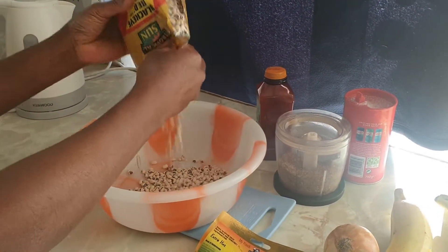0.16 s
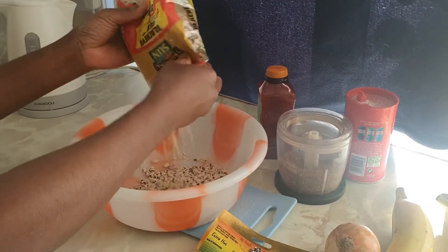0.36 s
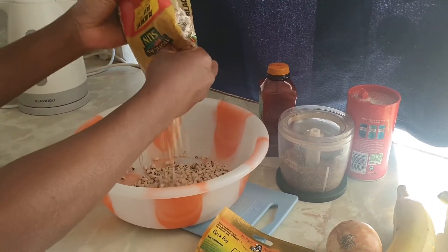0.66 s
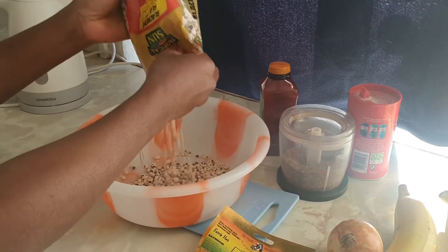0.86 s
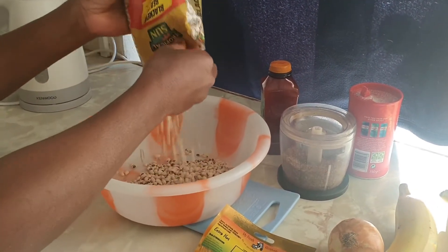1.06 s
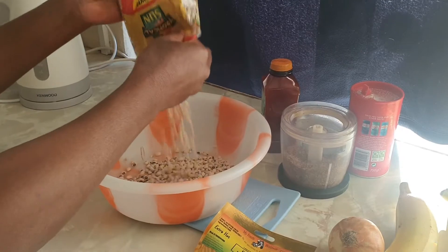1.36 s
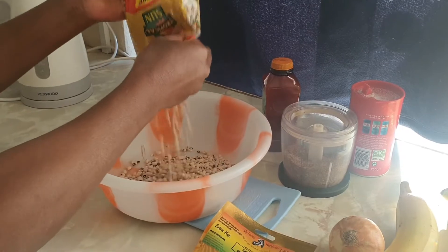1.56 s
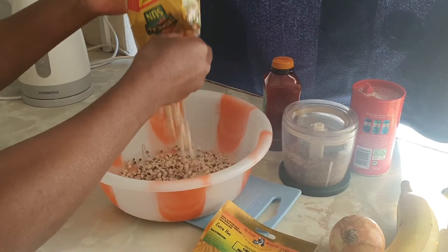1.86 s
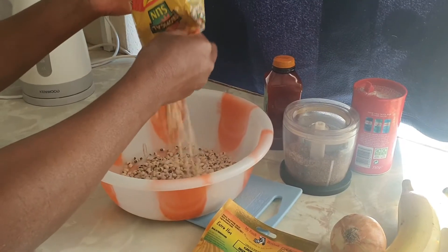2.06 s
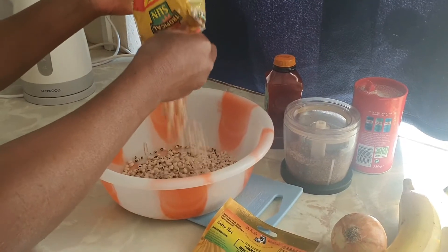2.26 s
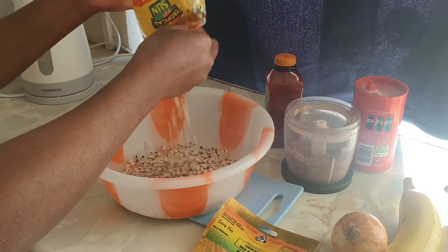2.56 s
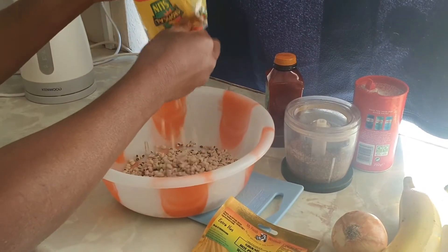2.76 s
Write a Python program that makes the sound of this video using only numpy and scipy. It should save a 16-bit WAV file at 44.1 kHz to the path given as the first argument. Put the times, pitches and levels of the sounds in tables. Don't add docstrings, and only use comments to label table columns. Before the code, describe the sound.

Dried beans are shaken from a plastic packet into a plastic bowl, a dense clicking rattle surging about five times a second, with sharp single snaps and bright rustle, heard close in a small hard kitchen.

```python
import sys
import numpy as np
from scipy import signal
from scipy.fft import rfft, irfft
from scipy.io import wavfile

SR = 44100
rng = np.random.default_rng(int(sys.argv[2]) if len(sys.argv) > 2 else 0)


def output_pcm(signal):
    pcm = np.clip(np.atleast_2d(signal).T, -1, 1) * 32767
    wavfile.write(sys.argv[1], SR, np.round(pcm).astype(np.int16))


def amplitude_ratio(level_db):
    exponent = np.asarray(level_db, float) / 20
    return 10 ** exponent


N = 127890

# time_s, level_db
HUM_SWELL = [(0, -63), (.3, -79), (.62, -75), (.75, -54), (1.0, -56), (1.1, -62.5), (1.55, -66),
             (1.7, -54.5), (2.15, -58), (2.25, -64), (2.9, -63)]
# pitch_hz, level_db (per Hz)
ROOM_COLOUR = [(35, -55), (60, -14.5), (135, -12), (179, -4), (248, -8), (430, -3), (500, -16.5),
               (650, -11), (1100, -120)]
# pitch_hz, level_db
STEREO_WIDTH = [(60, -6), (180, -22), (550, -1.5), (1650, -0.5), (4970, -2), (15000, 0.5)]
# time_s, level_db
BEAN_FLOW = [(0, -33), (.04, -35.5), (.078, -36), (.11, -32.5), (.2, -28), (.38, -27), (.55, -22.5),
             (.7, -24), (.84, -24.5), (1.03, -24.5), (1.2, -22), (1.43, -24), (1.65, -22.5), (1.85, -26.5),
             (2.0, -26.5), (2.35, -28), (2.7, -30), (2.8, -34.5)]
# time_s, level_db
BEAN_BUNCHES = [(.043, -4), (.078, -7.5), (.149, -7.5), (.222, -3.5), (.296, 1.5), (.345, 2.5), (.395, -2),
                (.452, -3), (.475, 3), (.528, -5), (.551, -4), (.575, 2), (.615, 1.5), (.736, -3),
                (.805, 4), (.824, -3), (.901, 1), (.915, -3), (.932, 1.5), (.963, -2.5), (1.037, -8.5),
                (1.138, -3), (1.187, 2), (1.245, -0.5), (1.303, 2.5), (1.422, 0), (1.507, -1), (1.54, -0.5),
                (1.567, -3.5), (1.628, -5.5), (1.768, -6), (1.812, 2), (1.832, -3), (1.88, 3), (1.944, 3),
                (1.966, -2), (1.985, -1.5), (2.014, -1.5), (2.156, -3), (2.209, -1.5), (2.337, -2),
                (2.357, -1), (2.427, 0.5), (2.48, 4.5), (2.579, -1.5), (2.615, 5), (2.658, -2), (2.71, 2),
                (2.735, -2.5), (2.791, -4.5), (2.835, -1.5), (2.874, -2)]
# time_s, rattle_surge_db, rustle_surge_db
PACKET_SHAKES = [(.006, 13.5, 7), (0.256, 5.5, 4.5), (0.329, 3.5, 1.5), (.47, 0.5, -1), (.68, 2, 7.5),
                 (0.885, 7.5, 10), (1.09, 5.5, 8), (1.3, 6, 2.5), (1.498, 7, 7), (1.707, 2, 5),
                 (1.907, 3.5, 5.5), (2.066, 3, 8), (2.268, 3.5, 4), (2.458, 2.5, 0.5), (2.699, 2.5, 1),
                 (2.878, 9, 8)]
# time_s, level_db
RUSTLE_LEVEL = [(0, -57), (.075, -62), (.2, -46), (.3, -46), (.55, -44.5), (1.0, -46.5), (1.4, -42),
                (1.98, -43.5), (2.4, -39.5), (2.62, -45), (2.72, -40.5), (2.79, -52), (2.835, -49),
                (2.86, -47)]
# pitch_hz, level_db (per Hz)
RUSTLE_COLOUR = [(4120, -9), (7000, -8), (7940, -4), (8610, 0), (10100, -9.5), (12000, 0.5), (14200, -10),
                 (15800, -11)]
# start_s, snap_peak_db, snap_pitch_hz, wall_ring_db
HARD_BEANS = [(.007, -19.5, 2960, -20.5), (.031, -23.5, 900, -35), (0.092, -31, 3000, -27),
              (0.101, -30, 2480, -22), (.116, -14, 3140, -18), (.136, -38, 1600, -35),
              (0.16, -23, 4560, -34), (0.18, -25, 2520, -20.5), (.249, -19, 2500, -21),
              (0.257, -5.5, 4070, -25), (0.406, -20, 2270, -27), (.419, -6.5, 4970, -27),
              (0.465, -12, 3600, -31), (.509, -17, 3000, -24), (.65, -12, 3700, -18),
              (0.863, -16, 2500, -21), (0.925, -4, 3470, -14), (0.979, -7, 3250, -28),
              (1.003, -10.5, 3580, -33), (1.047, -13, 3020, -38), (1.087, -14, 3800, -24),
              (1.299, -7, 3500, -21), (1.396, -15, 2500, -32), (1.589, -8.5, 3620, -33),
              (1.642, -16, 3340, -30), (1.841, -12.5, 4040, -24), (1.924, -17, 2400, -22),
              (1.976, -21, 3000, -25), (2.022, -13, 4930, -36), (2.052, -16, 2500, -17.5),
              (2.061, -15.5, 1500, -15), (2.110, -26, 1500, -21), (2.222, -20, 3200, -29),
              (2.256, -13, 1450, -17.5), (2.268, -24, 1450, -23), (2.273, -21, 1500, -19),
              (2.286, -14, 1950, -30), (2.3735, -7, 4600, -26), (2.3755, -12, 5600, -30),
              (2.603, -12, 3300, -24), (2.8465, -7, 3800, -28), (2.408, -14, 4480, -36),
              (2.464, -10, 4100, -22), (2.555, -15, 1640, -25.5), (2.678, -20, 3440, -20.5),
              (2.801, -26, 2600, -35), (2.8205, -18, 2430, -26), (2.852, -19.5, 1390, -22.5),
              (2.883, -20.5, 2000, -34), (2.89, -24, 3900, -28)]
# pitch_hz, level_db (per Hz)
CLICK_COLOUR = [(200, -36.5), (560, -12), (1000, -10.5), (1700, -6), (3800, -4), (5000, -6.5), (6650, -5.5),
                (8200, -23.5)]
# pitch_hz, level_db, t60_s
BOWL_MODES = [(553.6, -7, 0.041), (600, -9, 0.064), (690, -1.5, 0.027), (780, -6.5, 0.039),
              (1035.4, -8, 0.048), (1158, -8, 0.051), (1280, -1, 0.019), (1433, -0.5, 0.027),
              (1635, 1.5, 0.026), (1743, -4, 0.04), (1953, 0, 0.021), (2414, 2, 0.021), (3544, 4.5, 0.012),
              (4070, -3.5, 0.02)]

ROOM_NOISE_DB, COUNTER_FOLLOWS = -51, 0.6
HUM_HZ, HUM_WANDER_HZ = 41.8, 0.76
KITCHEN_T60_S, KITCHEN_DB, KITCHEN_GAP_S = 0.57, -8, 0.0034
LEFT_DB, RIGHT_LAG = 0.5, 2

SURGE_RISE_S, SURGE_FALL_S, SURGE_SHARE = 0.025, 0.02, 0.7
BUNCH_S, BUNCH_CHANCE_DB = 0.0055, 0.36
FIRST_TOUCH = 2.9
BEAN_LOW_HZ, BEAN_HIGH_HZ, BEAN_WIDTH_HZ, BEAN_RING = 1500, 4150, 250, 1.47

CLICKS_PER_S, CLICK_SPREAD_DB, CLICK_T60_S, CLICK_DB, CLUMP_DB = 2600, 3.0, 0.0053, 0.5, 1.0
TICKS_PER_S, TICK_SPREAD_DB, TICK_T60_S, TICK_DB, TICK_CLUMP_DB = 2500, 2.5, 0.0076, 2.6, 1.4
SHARED_TICKS = 0.43
TOP_HZ = 15800

KNOCKS_PER_S, KNOCK_SPREAD_DB, KNOCK_DB = 900, 3, -3
BOWL_LOWEST_HZ = 389
KNOCK_SURGE, DEEP_SURGE, DEEP_HZ = 0.2, 0.36, 900
DEEP_FOLLOWS = 0.59
FILL_DB_PER_S = -1

HIT_DB, HIT_RING_DB, HIT_T60_S = 0.0, 1.0, 0.016
SNAP_OCTAVES, SNAP_TOP_HZ, SNAP_AIR = 0.6, 6740, 0.25
WALL_HZ, WALL_OCTAVES = 1580, 0.22
WALL_SPREAD_S = 0.002


def rms_one(x):
    return x / np.sqrt(np.mean(x ** 2) + 1e-20)


def curve(rows):
    return np.interp(np.arange(N) / SR, *np.transpose(rows))


def at_hz(points, size):
    hz, value = np.transpose(points)
    return np.interp(np.log(np.fft.rfftfreq(size, 1 / SR) + 1), np.log(hz), value)


def colour(x, spectrum):
    cepstrum = irfft(np.log(amplitude_ratio(np.maximum(at_hz(spectrum, size=8192), -90))))
    cepstrum[1:4096] *= 2
    cepstrum[4097:] = 0
    impulse = irfft(np.exp(rfft(cepstrum)))[None, :4096]
    return signal.fftconvolve(x, impulse, axes=1)[:, :N]


def pair(mid, side):
    side = irfft(rfft(side) * amplitude_ratio(at_hz(STEREO_WIDTH, size=len(side))), len(side))
    return np.array([mid + side, mid - side])


def drift(rate_hz):
    r = np.exp(-2 * np.pi * rate_hz / SR)
    noise = rng.standard_normal(N + SR)
    return rms_one(signal.lfilter([1], [1, -2 * r, r * r], noise)[SR:])


def room_noise():
    phase = 2 * np.pi * np.cumsum(HUM_HZ + HUM_WANDER_HZ * drift(2.2)) / SR
    hum = np.sqrt(2) * amplitude_ratio(curve(HUM_SWELL)) * np.sin(phase)
    flow_db = curve(BEAN_FLOW)
    air_db = ROOM_NOISE_DB + COUNTER_FOLLOWS * (flow_db - flow_db.mean())
    air = rms_one(colour(pair(*rng.standard_normal((2, N))), ROOM_COLOUR))
    return hum + amplitude_ratio(air_db) * air


def kitchen(x):
    t = np.arange(SR // 2) / SR
    tail = pair(*rng.standard_normal((2, len(t)))) * amplitude_ratio(-60 * t / KITCHEN_T60_S) * (t > KITCHEN_GAP_S)
    tail = signal.lfilter([1], [1, -.4], tail)
    tail = tail / np.sqrt(np.sum(tail ** 2) / 2)
    return amplitude_ratio(KITCHEN_DB) * signal.fftconvolve(x.mean(0)[None], tail, axes=1)[:, :N]


def surges(column):
    t, out = np.arange(N) / SR, np.zeros(N)
    for row in PACKET_SHAKES:
        since = t - row[0]
        spread_s = np.where(since < 0, SURGE_RISE_S, SURGE_FALL_S)
        out += row[column] * np.exp(-.5 * (since / spread_s) ** 2)
    return out


def bunching():
    t = np.arange(N) / SR
    out = BUNCH_CHANCE_DB * drift(29)
    for s, db in BEAN_BUNCHES:
        out += db * np.exp(-.5 * ((t - s) / BUNCH_S) ** 2)
    return out


def burst(t60):
    decay = amplitude_ratio(-60 * np.arange(512) / SR / t60)
    mid, side = rng.standard_normal((2, 512)) * decay
    mid[0], side[0] = FIRST_TOUCH, FIRST_TOUCH * rng.uniform(-0.83, 1)
    return rms_one(pair(mid, side)) / np.sqrt(512)


def impacts(per_s, spread_db):
    sizes = amplitude_ratio(spread_db * np.minimum(rng.exponential(1, N), 4.5))
    sizes = sizes * rng.choice([-1, 1], N)
    return sizes * (rng.random(N) < per_s / SR)


def scatter(clicks, t60, count, note=0.):
    spot, out = rng.integers(0, count, N), 0
    for k, hz in enumerate(np.linspace(BEAN_LOW_HZ, BEAN_HIGH_HZ, count)):
        clatter = burst(t60)
        resonator = signal.iirpeak(hz, hz / BEAN_WIDTH_HZ, fs=SR)
        clatter = clatter + note * signal.lfilter(*resonator, clatter)
        out = out + signal.oaconvolve((clicks * (spot == k))[None], clatter, axes=1)[:, :N]
    return out


def bowl(strikes):
    out = np.zeros((2, N))
    for (hz, db, t60), push in zip(BOWL_MODES, strikes):
        r, w = amplitude_ratio(-60 / (t60 * SR)), 2 * np.pi * hz / SR
        ring = signal.lfilter([0, amplitude_ratio(db) * np.sin(w)], [1, -2 * r * np.cos(w), r * r], push + 1e-18)
        left = ring * amplitude_ratio(rng.normal(0, 0.57))
        right = np.roll(ring, rng.integers(-5, 3)) * amplitude_ratio(rng.normal(0, 0.57))
        out += [left, right]
    return signal.sosfilt(signal.butter(4, BOWL_LOWEST_HZ, "high", fs=SR, output="sos"), out)


def packet_rustle(clicks, clump):
    ticks = scatter(impacts(TICKS_PER_S, TICK_SPREAD_DB), TICK_T60_S, count=12)
    ticks = rms_one(ticks) + SHARED_TICKS * clicks
    level_db = TICK_DB + curve(RUSTLE_LEVEL) + surges(2) + TICK_CLUMP_DB * clump
    return amplitude_ratio(level_db) * rms_one(colour(ticks, RUSTLE_COLOUR))


def wall_rings(at, ring_db):
    modes = np.arange(len(BOWL_MODES))[:, None]
    octaves = np.log2(np.array(BOWL_MODES)[:, :1] / WALL_HZ)
    wall = np.exp(-.5 * (octaves / WALL_OCTAVES) ** 2)
    late, share = rng.random((2, len(BOWL_MODES), len(at)))
    when = at + (late * WALL_SPREAD_S * SR).astype(int)
    strikes = np.zeros((len(BOWL_MODES), N))
    strikes[modes, when] = amplitude_ratio(ring_db + HIT_RING_DB) * wall * (.5 + share / 2)
    return bowl(strikes)


def hard_beans():
    start_s, _, _, ring_db = np.transpose(HARD_BEANS)
    at = (start_s * SR).astype(int)
    snaps = np.zeros((2, N + 512))
    for i, (_, db, hz, _) in zip(at, HARD_BEANS):
        edges = hz * 2 ** np.array([-SNAP_OCTAVES, SNAP_OCTAVES * 1.29])
        band = signal.butter(2, edges, "band", fs=SR, output="sos")
        snap = signal.sosfilt(band, burst(HIT_T60_S))
        snaps[:, i:i + 512] += amplitude_ratio(db + HIT_DB) * snap / np.abs(snap.mean(0)).max()
    dull = signal.sosfilt(signal.butter(6, SNAP_TOP_HZ, fs=SR, output="sos"), snaps)
    return (dull + SNAP_AIR * snaps)[:, :N] + wall_rings(at, ring_db)


def bowl_knocks(flow_db, surge_db, busy, clump):
    fill_db = FILL_DB_PER_S * np.arange(N) / SR
    knocks = impacts(KNOCKS_PER_S * busy, KNOCK_SPREAD_DB) / np.sqrt(busy)
    knocks = knocks * amplitude_ratio(flow_db + CLUMP_DB * clump + fill_db)
    deep = np.array([hz < DEEP_HZ for hz, _, _ in BOWL_MODES])
    share = np.where(deep, DEEP_SURGE, KNOCK_SURGE)
    steady = np.where(deep, 1 - DEEP_FOLLOWS, 0)
    mode_db = np.outer(share, surge_db) - np.outer(steady, flow_db - flow_db.mean())
    rings = bowl(knocks * amplitude_ratio(mode_db) * rng.standard_normal((len(BOWL_MODES), N)))
    rings *= np.sqrt(np.mean(amplitude_ratio(flow_db) ** 2) / np.mean(rings ** 2))
    return amplitude_ratio(KNOCK_DB) * rings


def pour():
    flow_db, surge_db, clump = curve(BEAN_FLOW), SURGE_SHARE * surges(1), bunching()
    busy = amplitude_ratio(flow_db + surge_db - flow_db.mean())
    clicks = impacts(CLICKS_PER_S * busy, CLICK_SPREAD_DB) / np.sqrt(busy)
    clicks = rms_one(scatter(clicks, CLICK_T60_S, count=30, note=BEAN_RING))
    heap_db = CLICK_DB + flow_db + surge_db + CLUMP_DB * clump
    heap = amplitude_ratio(heap_db) * rms_one(colour(clicks, CLICK_COLOUR))
    rustle = packet_rustle(clicks, clump)
    top = signal.ellip(10, .5, 50, TOP_HZ, fs=SR, output="sos")
    return signal.sosfilt(top, heap + rustle) + bowl_knocks(flow_db, surge_db, busy, clump)


def scene():
    near = pour() + hard_beans()
    left, right = (near + kitchen(near)) * amplitude_ratio([[LEFT_DB], [-LEFT_DB]])
    return np.array([left, np.roll(right, RIGHT_LAG)]) + room_noise()


def low_pass(x):
    return signal.sosfilt(signal.butter(12, 16510, fs=SR, output="sos"), x)


def record(dry):
    return low_pass(dry)


dry = scene()
out = record(dry)
output_pcm(out)
```